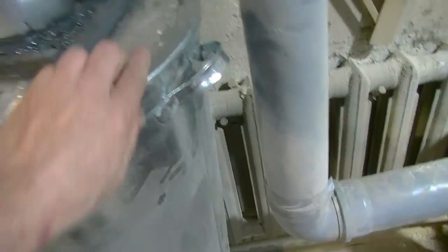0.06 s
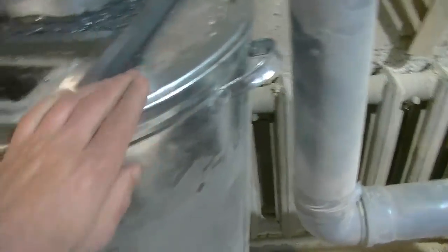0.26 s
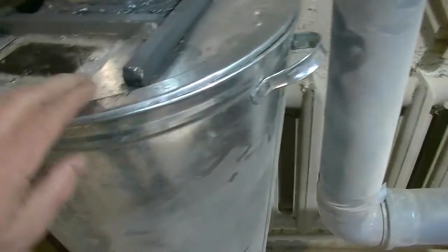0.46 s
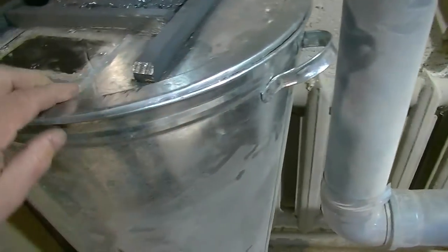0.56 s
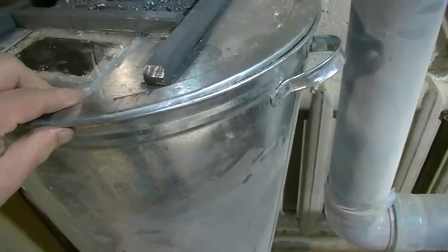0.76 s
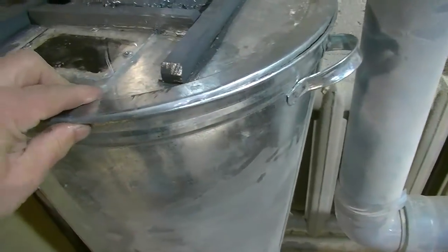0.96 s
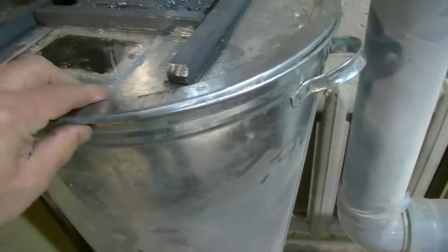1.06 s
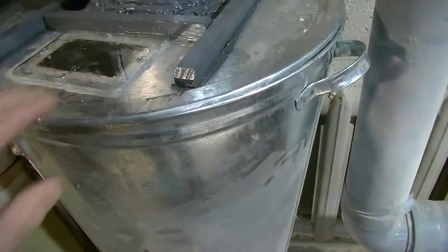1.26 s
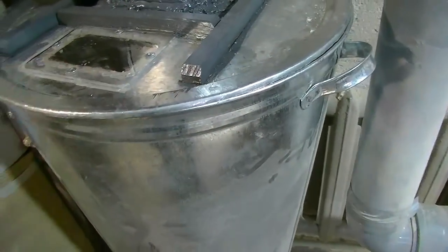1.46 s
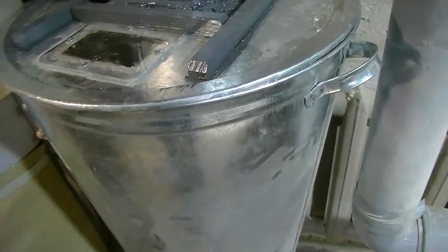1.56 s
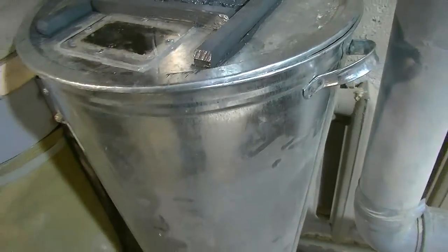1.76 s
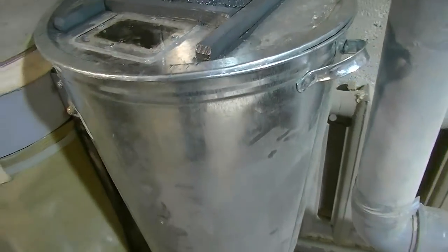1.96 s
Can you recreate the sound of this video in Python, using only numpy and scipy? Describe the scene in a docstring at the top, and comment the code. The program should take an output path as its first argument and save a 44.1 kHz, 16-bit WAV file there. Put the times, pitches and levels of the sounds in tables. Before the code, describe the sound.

Loud metallic double clank of a ring snapping onto a metal bin, then faint handling ticks

```python
"""Clamp ring closing on a sheet-metal bin

Close by and a little to the left, a steel clamp ring goes over the rim of the bin: it catches, snaps
shut and seats with a second clank. Struck modes and dying noise make the metal; damped sines make the
lid's beating hum. Swelling noise is the hand that slides over it, with light knocks and dry ticks.
A short gritty scuff of noise lies farther off, and steady coloured noise is the quiet workshop air."""
import sys
import numpy as np
from scipy import signal
from scipy.fft import rfft, irfft, next_fast_len
from scipy.io import wavfile

SR = 44100
rng = np.random.default_rng(int(sys.argv[2]) if len(sys.argv) > 2 else 0)


def unload_wav(signal):
    """Save mono or channel-first audio to the path in sys.argv[1] as 16-bit WAV at rate SR, clipped to [-1, 1]."""
    wavfile.write(
        sys.argv[1],
        SR,
        np.round(np.clip(np.atleast_2d(signal).T, -1, 1) * 32767).astype(np.int16),
    )


N = 88200  # two seconds

# Workshop air. Each row: frequency in Hz, relative density in dB per Hz.
AIR_SPECTRUM = [(12, -32), (20, 8), (219, -4.5), (352, -1), (404, -5), (705, -6), (1100, -9.5), (1380, -12),
                (2840, -16), (3260, -17), (11400, -24.5), (14300, -31.5), (15500, -24)]
# Left-right likeness of the air. Each row: frequency in Hz, likeness from 0 to 1.
AIR_LIKENESS = [(50, 0.17), (500, 0.14), (2000, 0), (10000, 0.13)]
# Narrow bands that stand out of the air. Each row: centre in Hz, spread in Hz, level in dB.
AIR_BANDS = [(808, 35, -75), (14460, 130, -80)]
AIR_DB = -62

# Strokes of the hand over lid and ring. Each row: peak in seconds, rise in seconds, fall in seconds,
# body level in dB, hiss level in dB, resonance of the rubbed spot in Hz, level of that resonance in dB.
HAND_STROKES = [(.03, 0.057, 0.12, -49.5, -61, 555, -55), (0.106, 0.041, 0.024, -50, -48.5, 3220, -52.5),
                (0.168, 0.046, 0.2, -56, -56.5, 560, -66), (.345, 0.044, 0.032, -57, -52.5, 610, -50),
                (.403, 0.045, 0.019, -50, -48.5, 4100, -61), (.92, 0.12, 0.2, -61.5, -62.5, 415, -66.5),
                (1.115, 0.055, 0.043, -59.5, -61, 830, -65), (1.201, 0.029, 0.03, -67, -68.5, 183, -63.5),
                (1.365, 0.026, 0.047, -60.5, -62, 890, -64), (1.99, 0.098, .05, -65.5, -85, 820, -69)]
# Dull rub of skin on steel. Each row: frequency in Hz, relative density in dB per Hz.
RUB_BODY_SPECTRUM = [(40, -18.5), (150, 1.5), (350, -6.5), (580, -2), (1100, -8.5), (1800, -8),
                     (3000, -12.5), (6000, -27), (15000, -70)]
# Hiss of skin on steel. Each row: frequency in Hz, relative density in dB per Hz.
RUB_HISS_SPECTRUM = [(300, -21.5), (1500, -7.5), (3000, -3.5), (6000, -0.5), (11000, -4.5), (15000, -10)]
SPOT_OCTAVES = 0.13  # spread of a spot's resonance

# Diffuse answer of the workshop. Each row: frequency in Hz, time to fall 60 dB in seconds.
ROOM_DECAY = [(100, 0.76), (300, 0.65), (1000, .58), (2000, 0.4), (4000, 0.4), (12000, 0.22)]
ROOM_DB, SCUFF_ROOM_DB = -12.5, -3.5  # room against direct sound: close metal, far scuff

# Contacts of ring, lid and rim. Each row: start in seconds, relative thud, clang and crack strengths in dB,
# time constant of the rise in seconds, ring time as a share of the free ring.
CONTACTS = [(.186, -26, -43, -75, 0.0015, 0.58), (0.202, -30, -33, -64, 0.0009, 0.82),
            (0.2271, -25, -29.5, -37, 0.0025, 1), (.2342, -15, -18, -18, 0.0014, 0.62),
            (0.2431, -21.5, -25, -32, 0.0026, 0.82), (0.2696, -19, -23, -29, 0.0018, 0.93),
            (0.2756, -15, -24, -34, 0.0018, 0.74), (.2985, -26, -29.5, -48, 0.0013, 0.68),
            (.674, -54, -57.5, -59, 0.0027, 1), (0.712, -46, -60, -74, 0.00073, 0.71),
            (.981, -36.5, -45, -55, 0.0023, 0.49), (1.017, -47, -65, -77, 0.0013, 0.3),
            (1.162, -45.5, -81, -66, 0.00062, 0.21)]
THUD_HZ, CLANG_HZ, CRACK_HZ = 211, 1700, 8550  # where each strength of a contact acts
# Crowded modes of the sheet metal. Each row: frequency in Hz, relative density in dB per Hz.
SHEET_SPECTRUM = [(25, -64), (55, -13), (85, -6), (130, 2), (270, -3), (500, -7.5), (1000, -13.5),
                  (2000, -9), (4300, -11.5), (4900, -16), (10000, -18), (15500, -24)]
# Free ring of the metal. Each row: frequency in Hz, time to fall 60 dB in seconds.
FREE_DECAY = [(60, 0.29), (250, 0.28), (700, 0.36), (2000, 0.2), (4000, 0.13), (7000, 0.097),
              (15000, 0.058)]
# Clear modes of the bin wall. Each row: frequency in Hz, relative level in dB.
BIN_MODES = [(122, -7.5), (172, -13), (243, -10), (266, -9), (292, -4), (383, -7), (436, -22), (484, -11.5),
             (546, -12.5), (596, -15), (702, -17)]
# Clear modes of the steel ring. Each row: frequency in Hz, relative level in dB.
RING_MODES = [(807, -13.5), (852, -29), (966, -15), (1061, -14.5), (1119, -11.5), (1285, -17.5),
              (1454, -23), (1491, -21), (1725, -12), (1794, -11.5), (1880, -21), (2211, -26), (2470, -13.5),
              (2790, -15.5), (3008, -18), (3190, -22), (3600, -20), (4190, -14.5), (4310, -15), (4430, -15),
              (5620, -19.5)]
SHEET_DB, BIN_DB, RING_DB = 16.5, -3.5, -1.5  # balance of the three
BIN_LENGTH = 0.79  # the wall's ring time as a share of the sheet's
MODE_PAN_DB_PER_KHZ = 2.1  # higher modes radiate more unevenly to the two sides
# Left-right likeness of the metal and room. Each row: frequency in Hz, likeness from 0 to 1.
METAL_LIKENESS = [(60, .98), (300, .975), (1000, .85), (3000, .68), (8000, .5), (15000, .3)]
# Lead of the left side for the close sounds. Each row: frequency in Hz, left over right in dB.
LEFT_LEAD = [(60, .2), (400, .6), (1300, 2.2), (3000, 3.7), (8000, 1.8), (15000, 2.5)]

# Drum modes of the lid, set going by the snap. Each row: frequency in Hz, level in dB,
# free time to fall 60 dB in seconds, moment the fingers begin to stop it in seconds.
LID_MODES = [(96.4, -41, 0.53, 0.9), (132.6, -32, 1.52, 1.2), (146.2, -41.5, 2.9, .8),
             (162, -33, 1.6, 0.778), (184.5, -32.5, 1.07, .8), (265.6, -38.5, 0.97, 0.36),
             (347, -41, 0.52, 1.1), (483, -52, .9, 1.1)]
LID_S, LID_RISE_S, FINGER_T60 = 0.236, 0.012, 0.14  # start, rise, added finger damping (all s)

# Dry ticks of the settling metal. Each row: start in seconds, level in dB, centre in Hz,
# spread in octaves, time to fall 60 dB in seconds.
METAL_TICKS = [(.639, -56, 12000, .6, .035), (1.4645, -51, 300, 1.25, .035)]

# Gritty scuff. Each row: frequency in Hz, relative density in dB per Hz.
SCUFF_SPECTRUM = [(47, -53), (80, -6), (206, -22.5), (263, -3), (521, -11), (864, -8.5), (1080, -11),
                  (1950, -11), (2970, -14), (13300, -21), (15500, -32)]
# Left-right likeness of the scuff. Each row: frequency in Hz, likeness from 0 to 1.
SCUFF_LIKENESS = [(100, .8), (700, 0.92), (1500, 0.7), (3100, 0.24), (7000, 0.46), (15000, 0)]
# Grit that catches during the scuff. Each row: start in seconds, level in dB.
GRIT_CATCHES = [(1.566, -47.5), (1.579, -53), (1.594, -61), (1.618, -55), (1.629, -44.5)]
SCUFF_S, SCUFF_RISE_S, SCUFF_HOLD_S = 1.563, 0.003, 0.044
SCUFF_DB, SCUFF_T60, CATCH_T60 = -50.5, 0.29, 0.036  # level (dB), dying times (s)

LOW_CUT_HZ, TOP_HZ = 34, 15900  # limits of the microphone


def amp(db):
    """Decibels to gain."""
    return 10 ** (np.asarray(db) / 20)


def unit(x):
    """Scale to rms 1."""
    return x / np.sqrt(np.mean(x ** 2) + 1e-20)


def along(points, hz):
    """Read (Hz, value) points on a log frequency axis."""
    f, v = np.transpose(points)
    return np.interp(np.log(hz + 1), np.log(f + 1), v)


def filtered(x, response):
    """Multiply the spectrum of x by a response of frequency."""
    m = next_fast_len(N + SR // 4)
    spectrum = rfft(x, m) * response(np.fft.rfftfreq(m, 1 / SR))
    return irfft(spectrum, m)[..., :N]


def octave_band(x, centre, octaves):
    """Keep a bell-shaped band around a centre, its spread given in octaves."""
    return filtered(x, lambda hz: np.exp(-(np.log2((hz + 1) / centre) / octaves) ** 2 / 2))


def add(track, s, sound):
    """Mix a sound into the track at time s."""
    part = track[..., max(round(s * SR), 0):][..., :sound.shape[-1]]
    part += sound[..., :part.shape[-1]]


def stereo(pair, alike):
    """Turn two unrelated signals into left and right of a given likeness."""
    def mid_side_gains(hz):
        turn = np.arccos(np.clip(along(alike, hz), 0, 1)) / 2
        return np.array([np.cos(turn), np.sin(turn)])

    mid, side = filtered(pair, mid_side_gains)
    return np.array([mid + side, mid - side])


def grains(spectrum, alike, grit_db, size=32):
    """Coloured stereo noise of rms 1, made of tiny slips whose strength scatters by grit_db."""
    strengths = amp(grit_db * rng.standard_normal(N // size + 1))
    slips = np.repeat(strengths, size)[:N]
    noise = rng.standard_normal((2, N)) * slips
    coloured = filtered(noise, lambda hz: amp(along(spectrum, hz)))
    return unit(stereo(coloured, alike))


def dying(t60, colour_db, size=512):
    """Two half-second noises of a given colour, each frequency dying at its own speed."""
    hz, t, z = signal.stft(rng.standard_normal((2, SR // 2)), SR, nperseg=size)
    level_db = colour_db(hz)[:, None] - 60 * t / t60(hz)[:, None]
    return signal.istft(z * amp(level_db), SR, nperseg=size)[1]


def modes(table, strength, length, scatter_db):
    """Damped sines in stereo, their levels scattered at each blow by scatter_db."""
    t = np.arange(SR // 2) / SR
    hz, db = np.transpose(table)
    side = (-1) ** np.arange(len(hz))  # neighbours lean to opposite sides
    pan_db = np.outer([.5, -.5], side * MODE_PAN_DB_PER_KHZ * hz / 1000)
    scatter = scatter_db * rng.standard_normal(len(hz))
    gains = side * amp(db + along(strength, hz) + pan_db + scatter)
    t60 = length * along(FREE_DECAY, hz)[:, None]
    return gains @ (np.sin(2 * np.pi * hz[:, None] * t) * np.exp(-np.log(1000) * t / t60))


def air():
    """Steady noise of the workshop air, with a faint drone and a thin high whine as narrow noise bands."""
    out = amp(AIR_DB) * grains(AIR_SPECTRUM, AIR_LIKENESS, grit_db=1.0)
    for centre, spread, db in AIR_BANDS:
        noise = rng.standard_normal((2, N))
        band = filtered(noise, lambda hz: np.exp(-((hz - centre) / spread) ** 2 / 2))
        out = out + amp(db) * unit(stereo(band, AIR_LIKENESS))
    return out


def hand():
    """Each stroke swells and fades: a dull rub, a hiss of skin and the resonance of the rubbed spot."""
    t = np.arange(N) / SR
    body, hiss, spots = np.zeros(N), np.zeros(N), np.zeros(N)
    for s, rise, fall, body_db, hiss_db, spot_hz, spot_db in HAND_STROKES:
        speed = np.exp(-((t - s) / np.where(t < s, rise, fall)) ** 2)
        body = np.hypot(body, amp(body_db) * speed)
        hiss = np.hypot(hiss, amp(hiss_db) * speed)
        spot = octave_band(rng.standard_normal(N), spot_hz, SPOT_OCTAVES)
        spots = spots + amp(spot_db) * speed * unit(spot)
    rub = body * grains(RUB_BODY_SPECTRUM, METAL_LIKENESS, grit_db=3.5)
    skin = hiss * grains(RUB_HISS_SPECTRUM, AIR_LIKENESS, grit_db=0.5)
    return rub + skin + spots


def room(x):
    """The workshop's short diffuse answer: the sound convolved with dying noise."""
    tail = dying(lambda hz: along(ROOM_DECAY, hz), np.zeros_like)
    tail = tail / np.linalg.norm(tail[0])
    wet = signal.fftconvolve(x.mean(axis=0)[None], tail, axes=1)[:, :N]
    return stereo(wet, METAL_LIKENESS)


def clamp():
    """Contacts ring the crowded sheet modes and the clear bin and ring modes; a resting hand damps them."""
    sheet, clear = np.zeros((2, N)), np.zeros((2, N))
    for s, thud, clang, crack, rise, length in CONTACTS:
        strength = [(THUD_HZ, thud), (CLANG_HZ, clang), (CRACK_HZ, crack)]

        def struck(x):
            return x * (1 - np.exp(-np.arange(x.shape[-1]) / SR / rise))

        crowd = dying(lambda hz: length * along(FREE_DECAY, hz),
                      lambda hz: along(SHEET_SPECTRUM, hz) + along(strength, hz), size=256)
        add(sheet, s, amp(SHEET_DB) * struck(crowd))
        wall = amp(BIN_DB) * modes(BIN_MODES, strength, BIN_LENGTH * length, scatter_db=0)
        ring = amp(RING_DB) * modes(RING_MODES, strength, length, scatter_db=1)
        add(clear, s, struck(wall + ring))
    return stereo(sheet, METAL_LIKENESS) + clear


def lid():
    """The lid hums like a drum skin, its close modes beating, until the fingers settle on it."""
    t = np.arange(N) / SR
    age = np.maximum(t - LID_S, 0)
    hum = np.zeros(N)
    for hz, db, t60, stop in LID_MODES:
        finger_db = 60 * np.maximum(t - stop, 0) / FINGER_T60
        hum += amp(db - 60 * age / t60 - finger_db) * np.sin(2 * np.pi * hz * age)
    return hum * (1 - np.exp(-age / LID_RISE_S))


def ticks():
    """Each tick of the settling metal is one short, damped band of noise."""
    out, t = np.zeros((2, N)), np.arange(SR // 8) / SR
    for s, db, centre, octaves, t60 in METAL_TICKS:
        band = unit(octave_band(rng.standard_normal((2, N)), centre, octaves))
        add(out, s, stereo(band, METAL_LIKENESS)[:, :len(t)] * amp(db - 60 * t / t60))
    return out


def scuff():
    """A short gritty slide of noise that starts almost at once, catches a few times and dies."""
    t = np.arange(N) / SR
    onset = np.clip((t - SCUFF_S) / SCUFF_RISE_S, 0, 1)
    fall_db = 60 * np.maximum(t - SCUFF_S - SCUFF_HOLD_S, 0) / SCUFF_T60
    level = onset * amp(SCUFF_DB - fall_db)
    for s, db in GRIT_CATCHES:
        level = np.hypot(level, (t >= s) * amp(db - 60 * np.abs(t - s) / CATCH_T60))
    return level * grains(SCUFF_SPECTRUM, SCUFF_LIKENESS, grit_db=2)


def scene():
    """The bin stands close, a little to the left; the scuff is farther off and wetter."""
    metal, far = clamp() + hand(), scuff()
    near = metal + lid() + ticks() + amp(ROOM_DB) * room(metal)
    placed = filtered(near, lambda hz: amp(np.outer([.5, -.5], along(LEFT_LEAD, hz))))
    return placed + far + amp(SCUFF_ROOM_DB) * room(far) + air()


def record(dry):
    """The microphone thins the deepest bass and falls off very steeply above its band limit."""
    low_cut = signal.butter(1, LOW_CUT_HZ, "high", fs=SR, output="sos")
    thinned = signal.sosfilt(low_cut, dry)
    return filtered(thinned, lambda hz: 1 / np.sqrt(1 + (hz / TOP_HZ) ** 160))


dry = scene()
out = record(dry)
unload_wav(out)
```